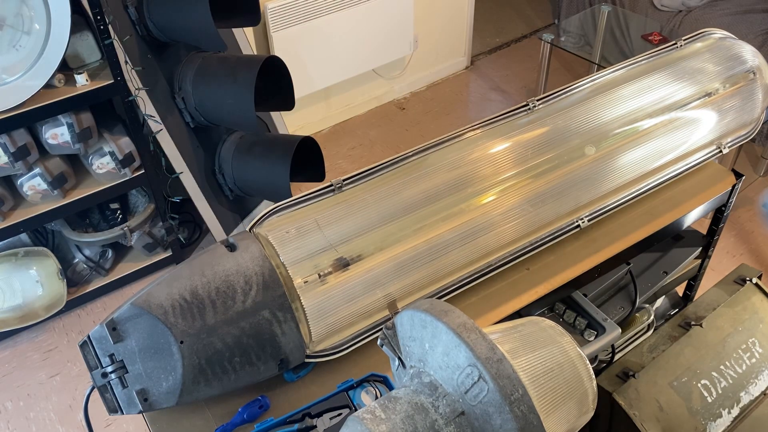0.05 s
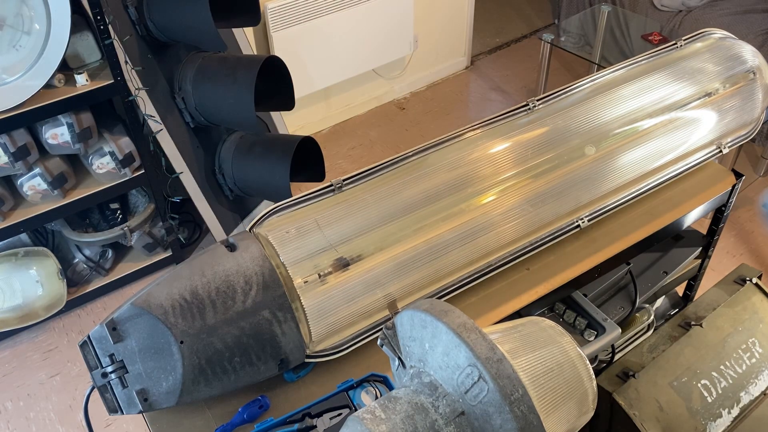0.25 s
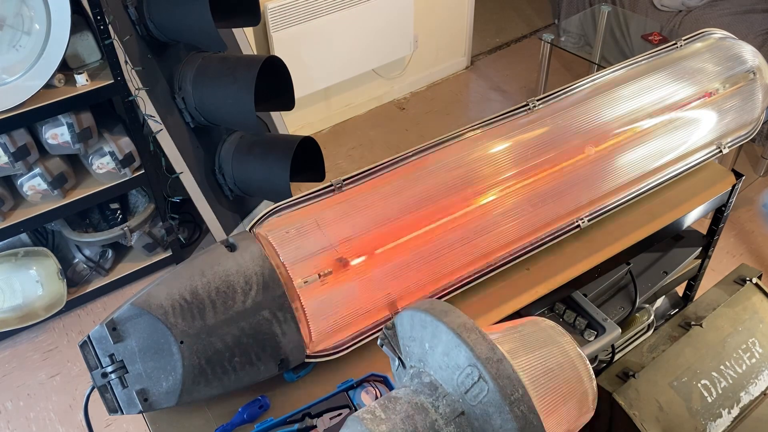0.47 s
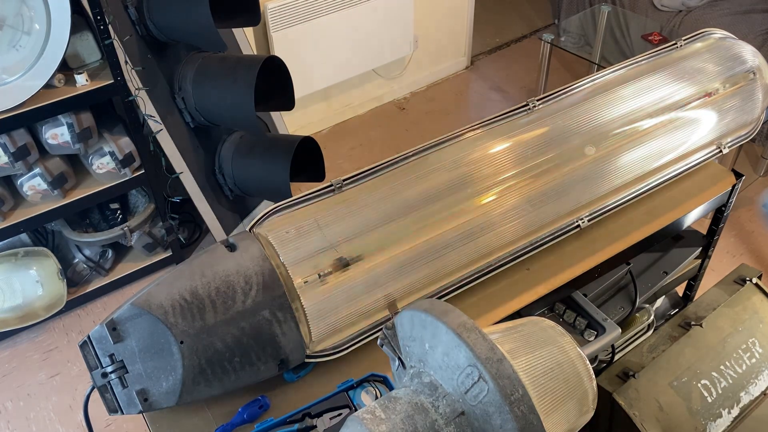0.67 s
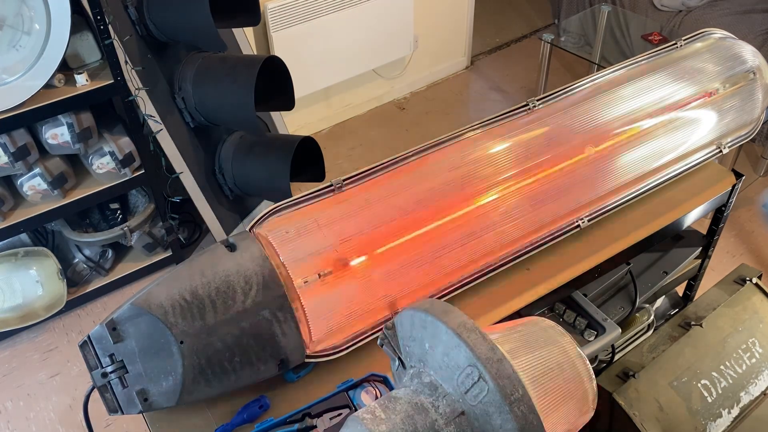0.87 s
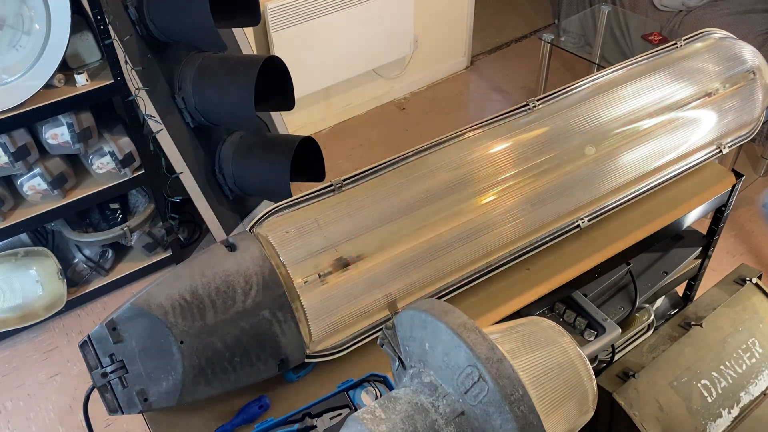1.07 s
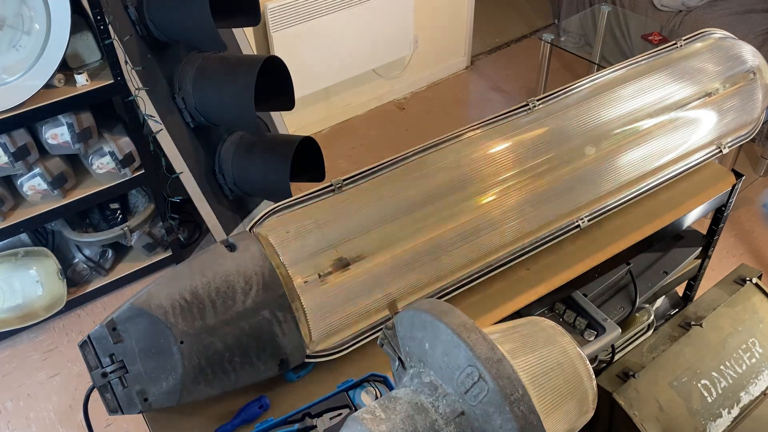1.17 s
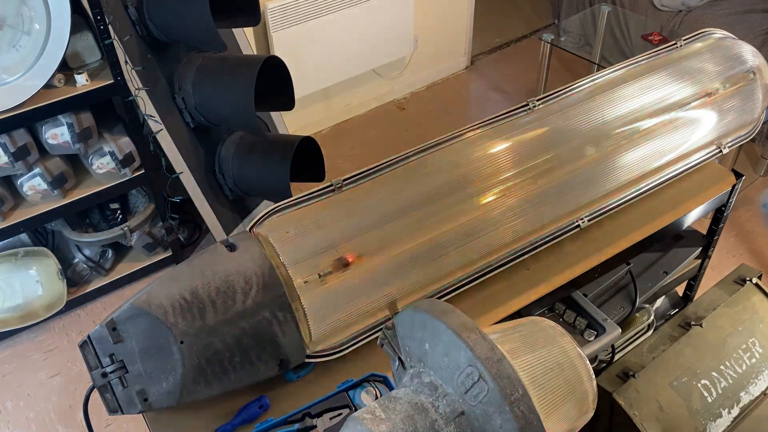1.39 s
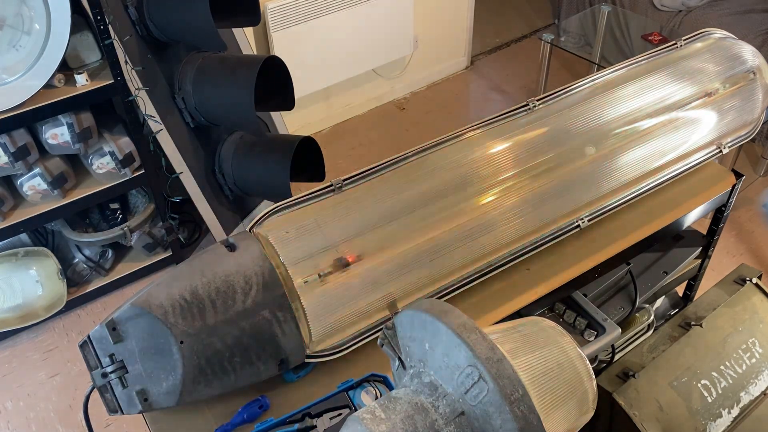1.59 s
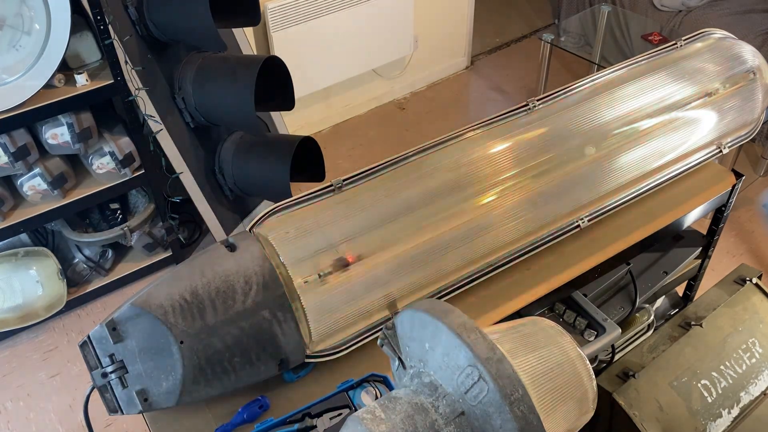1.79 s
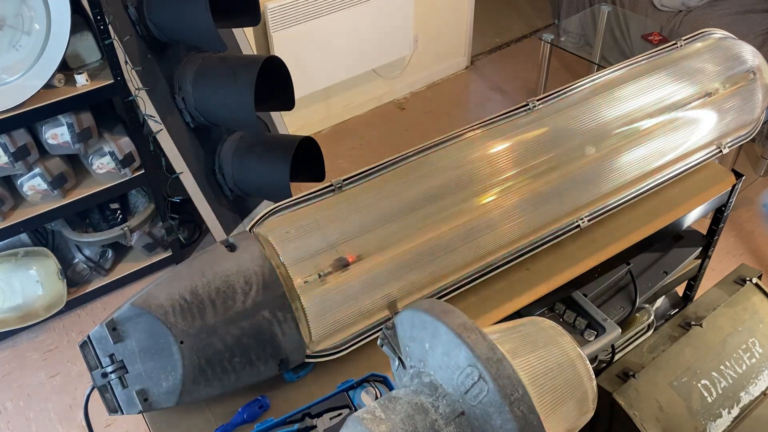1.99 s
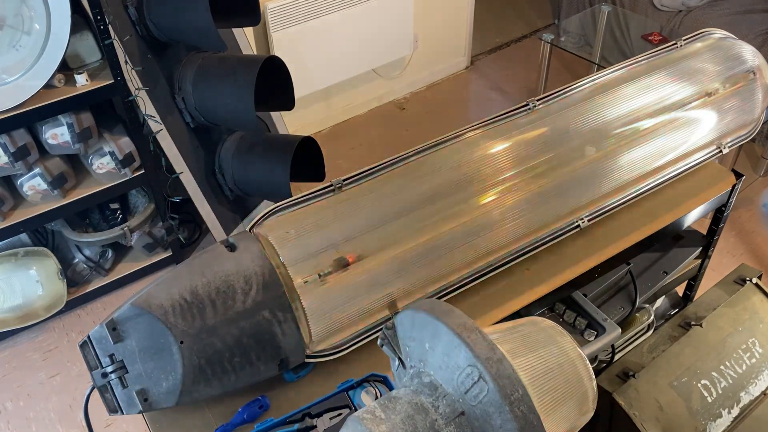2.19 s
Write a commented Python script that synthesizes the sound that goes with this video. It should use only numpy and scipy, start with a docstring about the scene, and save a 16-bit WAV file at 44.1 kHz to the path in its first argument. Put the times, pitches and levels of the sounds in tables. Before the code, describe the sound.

A heavy switch snaps over with a sharp clunk, followed by a few light metal ticks.

```python
"""A soft footfall, then a heavy switch snaps over in a small hard-walled workshop: its contacts crack, its
housing rings and the room booms low. Two light metal ticks follow. Someone shifts about nearby, cloth rustling
and weight shuffling on the floor; a sleeve gives one brisk swish and three soft steps fall. Four more ticks
close the scene over a quiet room tone."""
import sys
import numpy as np
from scipy import signal
from scipy.fft import rfft, irfft, next_fast_len
from scipy.io import wavfile
from scipy.ndimage import uniform_filter1d, map_coordinates

SR = 44100
rng = np.random.default_rng(int(sys.argv[2]) if len(sys.argv) > 2 else 0)


def put_to_file(sound):
    """Save the sound as 16-bit audio at rate SR, in the file named by the first command-line argument."""
    columns = np.atleast_2d(sound).T  # one column per channel
    safe = np.clip(columns, -1, 1)
    whole_steps = np.round(safe * 32767)
    wavfile.write(sys.argv[1], SR, whole_steps.astype(np.int16))


N = 99225

# the switch trips, strikes and rebounds: start_s, level_db, tilt_db_per_octave
SNAPS = [(0.2065, -6, -0.5), (0.2108, 0, 2.5), (0.2155, 0, -2), (.2200, -4.5, -0.5), (0.2297, -4.5, -4.5)]
# tone of a contact's crack: frequency_hz, level_db
CRACK_EQ = [(100, -26), (250, -11), (450, -7), (800, -0.5), (1400, 5), (1680, -2), (2400, 4), (3800, -2),
            (4600, 4.5), (5500, -2.5), (6200, 4.5), (7300, -3), (8300, -1), (9700, -5.5), (11000, -4.5),
            (14500, -8.5), (16000, -14)]
# ring of the housing: pitch_hz, level_db, t60_s
HOUSING_MODES = [(435.6, -3, 0.27), (683.4, -6, 0.47), (733, 4, 0.32), (780, -4, 0.44), (1132, 2.5, 0.32),
                 (1260, -16, 0.53), (1494, -6.5, 0.41), (2400, 4, 0.12), (2848, -10, 0.42),
                 (3174, -8.5, 0.5), (4376, -5.5, 0.42), (6060, 7.5, .12), (7330, 3, 0.29),
                 (10960, 1.5, 0.19)]
# low boom of the room's modes: pitch_hz, level_db, t60_s
ROOM_MODES = [(72.6, -5.5, 0.55), (107.5, 0, 0.25), (130.2, 3, .33), (187.4, -6.5, 0.3)]
SNAP_DB, HOUSING_DB, THUMP_DB, THUMP_START_S = -2, -39.5, -34.5, 0.216

# light ticks: start_s, level_db, direct_db, ping_db, ping_hz, knock_db, knock_hz
TICKS = [(0.4983, -4, -4, -3.5, 3320, 4, 794), (.5322, -10.5, -4.5, -14, 3500, -8, 1400),
         (1.815, -23, -23, 0.5, 3500, -13.5, 805), (1.976, -11, -13, 2.5, 3280, -7, 1094),
         (2.048, -21, -3, -12, 3430, 12, 1068), (2.164, -17, -17, 2, 3020, -8, 800)]
# tone of a tick's crack: frequency_hz, level_db
TICK_EQ = [(150, -6), (500, -4.5), (850, 5.5), (1600, -4), (2350, 2), (2750, -2.5), (3300, 1.5), (4600, -6),
           (7500, -4), (11000, -7), (15500, -10.5)]
# ring of the metal part: pitch_ratio, level_db, t60_s
PING_MODES = [(.72, -5, 0.11), (1.001, 0.5, 0.21)]
# knock of its mount: pitch_ratio, level_db, t60_s
KNOCK_MODES = [(1, 3, 0.036), (1.17, -3, 0.052), (1.35, -10.5, 0.083)]
TICK_DB, CLINK_DB, PING_DB, KNOCK_DB = -20, -38, -55.5, -50
TICK_T60_S, CLINK_T60_S = 0.0065, 0.014

# a sleeve's swish and two faint after-strokes: peak_s, level_db, rise_s, fall_s
SWISHES = [(1.316, -46.5, 0.042, 0.046), (1.395, -67, .03, 0.035), (1.448, -62.5, 0.031, 0.027)]
# tone of the swish: frequency_hz, level_db
SWISH_EQ = [(300, -47), (900, -10.5), (1750, -13.5), (2320, -3.5), (2650, -6.5), (3000, 1.5), (3400, -0.5),
            (3900, -2.5), (4450, -2), (5200, -2.5), (5900, -8), (7200, -6), (8300, -6.5), (11000, -9.5),
            (15500, -11.5)]
# fader of the rustling cloth: time_s, level_db
RUSTLE_FADER = [(0, -83), (.15, -108), (.19, -65), (.42, -66), (.68, -75.5), (.78, -65.5), (.83, -70),
                (.91, -63), (1.02, -68), (1.2, -70.5), (1.52, -69), (1.59, -63.5), (1.67, -69.5),
                (1.74, -69), (1.89, -76), (2.06, -66.5), (2.25, -80)]
# tone of the rustle: frequency_hz, level_db
RUSTLE_EQ = [(300, -27), (1000, 2.5), (1700, -5), (3300, -1), (5500, -7.5), (8000, -9.5), (11000, -7.5),
             (15500, -8.5)]

# faders of the shuffle's two layers: time_s, body_db, bass_db
SHUFFLE_FADERS = [(0, -70, -65.5), (.07, -68.5, -64.5), (.13, -68, -67.5), (.2, -59.5, -64),
                  (.46, -63.5, -69), (.56, -70, -81), (.82, -71.5, -75), (.86, -62.5, -85),
                  (.92, -63.5, -76), (.98, -72, -70), (1.2, -75.5, -83), (1.32, -72, -78),
                  (1.36, -65.5, -72), (1.44, -65.5, -72), (1.56, -71, -75.5), (1.7, -67.5, -73),
                  (1.87, -74.5, -79), (2.04, -70, -78), (2.25, -74, -76)]
# its dull body: frequency_hz, level_db
BODY_EQ = [(60, -21), (160, -3), (250, -2), (320, 2.5), (400, 1), (520, 0.5), (620, -2), (1050, -3.5),
           (1700, -16), (4000, -26)]
# its bass weight: frequency_hz, level_db
BASS_EQ = [(15, -44), (26, -26), (40, -0.5), (65, 1), (110, -2), (200, -14), (500, -43)]
# soft footfalls: start_s, level_db
STEPS = [(.01, 4.5), (1.355, 1), (1.44, -1.5), (1.684, -7)]
# boom of the floor: pitch_hz, level_db, t60_s
FLOOR_MODES = [(54.5, -5, .35), (77.3, -0.5, 0.3), (105, -6, 0.57), (170.7, -7, 0.17)]
GRAIN_DB, STEP_DB, AIR_DB = 0.5, -62, -81

# room tone: frequency_hz, level_db
AIR_EQ = [(20, -29), (50, 7), (300, -5), (1500, -13.5), (6000, -28), (15500, -19)]
# reverb off the hard walls: frequency_hz, t60_s
ROOM_DECAY = [(100, 0.5), (700, 0.3), (2500, 0.35), (5500, 0.34), (11000, 0.28), (16000, 0.29)]
# stereo width: frequency_hz, side_over_mid_db
WIDTH = [(25, -25), (60, -24.5), (120, -10), (200, -11.5), (380, -3.5), (700, -0.5), (1300, 2), (2400, -5),
         (4400, -7), (6200, -10.5), (8100, 2), (11000, -2), (15000, 4)]
# stereo lean: frequency_hz, left_over_right_db
BALANCE = [(200, 0.5), (700, -2), (1300, -.5), (2400, 1.7), (4400, 3.5), (8500, -0.5)]
# narrow treble dips: centre_hz, half_width_hz, gain_db
NOTCHES = [(9053, 604, -22.5), (13270, 530, -57)]
ROOM_RISE_S, TOP_HZ = 0.0037, 16100


def switch():
    """A burst of contacts; the hardest sets the housing ringing and the room booming low."""
    out = np.zeros((2, N))
    for s, db, tilt_db in SNAPS:
        add(out, s, amp(SNAP_DB + db) * contact(housing_colour, tilt_db, t60_s=0.02, direct_db=-4.5))
    strike_s = max(SNAPS, key=lambda row: row[1])[0]
    add(out, strike_s, amp(HOUSING_DB) * ring(HOUSING_MODES, rise_s=0.00063, blur=0.65))
    add(out, THUMP_START_S, amp(THUMP_DB) * ring(ROOM_MODES, rise_s=0.023, blur=0.59))
    return out


def housing_colour(hz, lift_db=4.5):
    """The EQ of a crack in dB, lifted at each of the housing's resonances."""
    peaks = 0
    for mode_hz, _, _ in HOUSING_MODES:
        half_width_hz = 17 + 0.0043 * mode_hz
        peaks += 1 / (1 + ((hz - mode_hz) / half_width_hz) ** 2)
    return along(CRACK_EQ, hz) + lift_db * peaks


def contact(colour_db, tilt_db, t60_s, direct_db):
    """Hard parts meet: a short crack of shaped noise, then the room's dense reverb."""
    t = np.arange(SR) / SR
    eq = lambda f: amp(colour_db(f) + tilt_db * np.log2(np.maximum(f, 300) / 3000))
    hz, frame_s, bands = signal.stft(diffuse(SR), SR, nperseg=256)
    decay = amp(-60 * frame_s / along(ROOM_DECAY, hz)[:, None])
    tail = signal.istft(bands * decay, SR, nperseg=256)[1][:, :SR]
    tail = filtered(tail, eq) * (1 - np.exp(-t / ROOM_RISE_S))
    crack = filtered(diffuse(SR), eq) * amp(-60 * t / t60_s) * (1 - np.exp(-t / 0.0014))
    return (unit(tail) + amp(direct_db) * unit(crack)) / np.sqrt(SR)


def ring(modes, rise_s, blur):
    """A struck body's decaying modes, blurred by reflections, each side in its own phase."""
    t = np.arange(SR) / SR
    out = np.zeros((2, SR))
    for hz, db, t60_s in modes:
        drift = map_coordinates(rng.standard_normal(size=128), [t * 70], mode="nearest")
        phase = 2 * np.pi * (hz * t + rng.random()) + blur * drift
        spread = np.arctan(amp(along(WIDTH, hz))) * np.array([[1], [-1]])
        out += amp(db - 60 * t / t60_s) * np.sin(phase + spread)
    return out * (1 - np.exp(-t / rise_s))


def ticks():
    """Small metal parts clink and ping, knocking their mounts, each with the room behind it."""
    out = np.zeros((2, N))
    tuned = lambda modes, hz: [(ratio * hz, db, t60_s) for ratio, db, t60_s in modes]
    for s, db, direct_db, ping_db, ping_hz, knock_db, knock_hz in TICKS:
        crack = amp(TICK_DB) * contact(lambda hz: along(TICK_EQ, hz), 0, TICK_T60_S, direct_db)
        # the clink is the tick's first, heavily damped cycles
        clink = amp(CLINK_DB) * ring([(ping_hz, direct_db, CLINK_T60_S)], rise_s=0.0004, blur=1)
        ping = amp(PING_DB + ping_db) * ring(tuned(PING_MODES, ping_hz), rise_s=0.001, blur=1.04)
        knock = amp(KNOCK_DB + knock_db) * ring(tuned(KNOCK_MODES, knock_hz), rise_s=0.002, blur=0.92)
        add(out, s, amp(db) * (crack + clink + ping + knock))
    return out


def cloth():
    """Fabric rubs in fine grains: a faint rustle and a sleeve stroke that swells and fades."""
    t = np.arange(N) / SR
    stroke = 0
    for peak_s, db, rise_s, fall_s in SWISHES:
        offset = (t - peak_s) / np.where(t < peak_s, rise_s, fall_s)
        stroke += amp(db) * np.exp(1 - np.hypot(1, 1.59 * offset))  # about 8 dB down at offset 1
    flutter = unit(uniform_filter1d(rng.standard_normal(N), size=50))
    grain = unit(amp(GRAIN_DB * flutter))
    rustle_db, = faders(RUSTLE_FADER)
    return grain * (stroke * noise_bed(SWISH_EQ) + amp(rustle_db) * noise_bed(RUSTLE_EQ))


def shuffle():
    """Dull rubbing and soft footfalls as weight shifts on the floor."""
    body_db, bass_db = faders(SHUFFLE_FADERS)
    out = amp(body_db) * noise_bed(BODY_EQ) + amp(bass_db) * noise_bed(BASS_EQ)
    for s, db in STEPS:
        add(out, s, amp(STEP_DB + db) * ring(FLOOR_MODES, rise_s=0.011, blur=0.44))
    return out


def room_tone():
    """The workshop's air: a steady, faint rumble and hiss."""
    return amp(AIR_DB) * noise_bed(AIR_EQ)


def noise_bed(eq):
    """Coloured stereo noise of rms 1."""
    return unit(filtered(diffuse(N), lambda hz: amp(along(eq, hz))))


def diffuse(size):
    """White stereo noise with the width of the room."""
    angle = lambda hz: np.arctan(amp(along(WIDTH, hz)))
    mid_side_gains = lambda hz: np.array([np.cos(angle(hz)), np.sin(angle(hz))])
    mid, side = filtered(rng.standard_normal((2, size)), mid_side_gains)
    return np.array([mid + side, mid - side])


def amp(db):
    """Decibels to gain."""
    return 10 ** (np.asarray(db) / 20)


def unit(x):
    """Scale to rms 1."""
    return x / np.sqrt(np.mean(x ** 2) + 1e-20)


def along(points, hz):
    """Read a curve on a log frequency axis."""
    points_hz, values = np.transpose(points)
    return np.interp(np.log(hz + 1), np.log(points_hz + 1), values)


def faders(rows):
    """One value per sample for each column after the time."""
    time_s, *columns = np.transpose(rows)
    return [np.interp(np.arange(N) / SR, time_s, column) for column in columns]


def filtered(x, response):
    """EQ x with a gain that is a function of frequency."""
    n = x.shape[-1]
    padded = next_fast_len(n + SR // 10)
    return irfft(rfft(x, padded) * response(np.fft.rfftfreq(padded, 1 / SR)), padded)[..., :n]


def add(track, start_s, sound):
    """Mix a sound into a track."""
    part = track[..., round(start_s * SR):][..., :sound.shape[-1]]
    part += sound[..., :part.shape[-1]]


def scene():
    """The full mix, the treble leaning left."""
    mix = switch() + ticks() + cloth() + shuffle() + room_tone()
    return filtered(mix, lambda hz: amp(along(BALANCE, hz) * np.array([[0.5], [-0.5]])))


def record(dry):
    """Master EQ: two narrow dips in the treble and a steep high cut."""
    def master_eq(hz):
        dips_db = sum(db * np.exp(-np.abs((hz - centre) / width) ** 3) for centre, width, db in NOTCHES)
        return amp(dips_db) * (hz < TOP_HZ)
    return filtered(dry, master_eq)


dry = scene()
out = record(dry)
put_to_file(out)
```